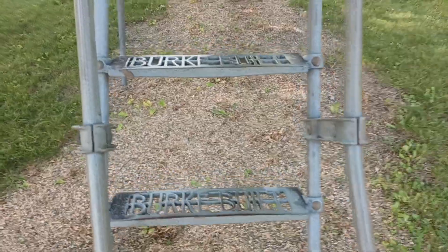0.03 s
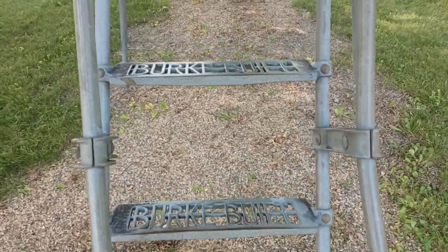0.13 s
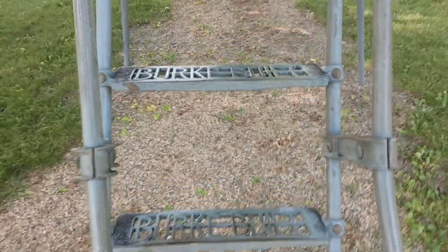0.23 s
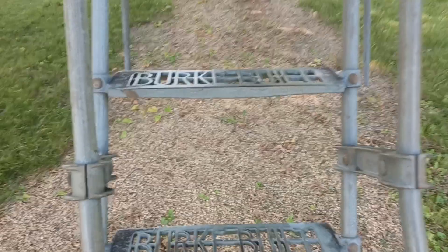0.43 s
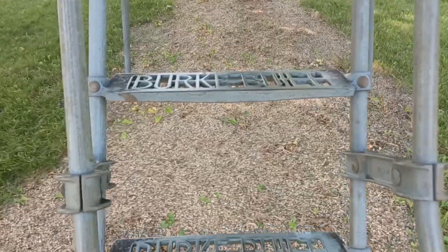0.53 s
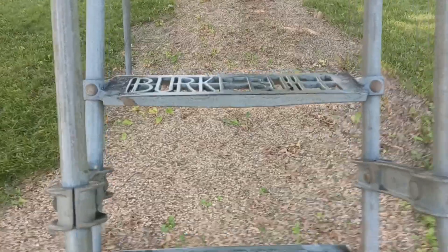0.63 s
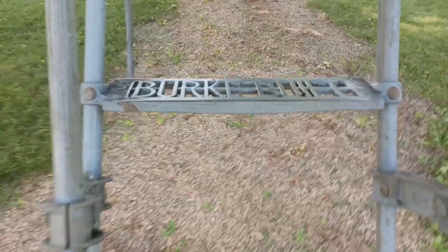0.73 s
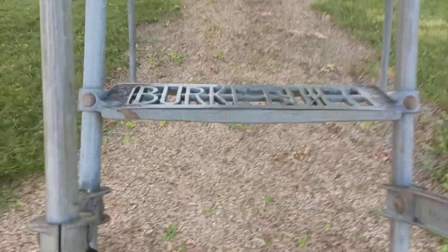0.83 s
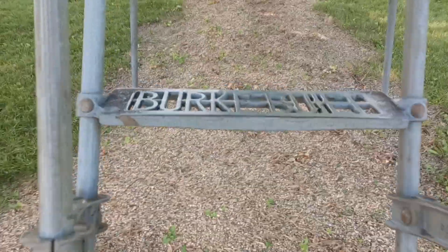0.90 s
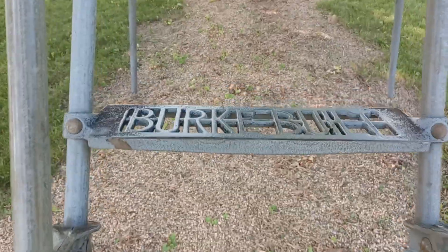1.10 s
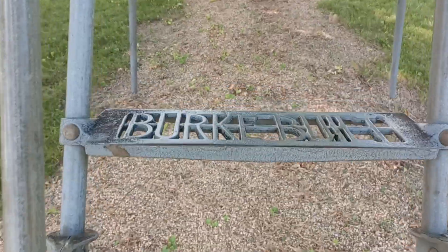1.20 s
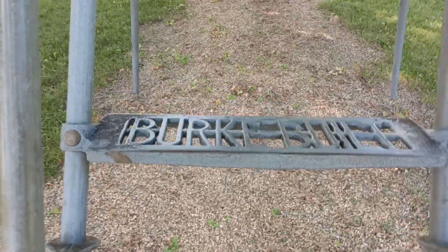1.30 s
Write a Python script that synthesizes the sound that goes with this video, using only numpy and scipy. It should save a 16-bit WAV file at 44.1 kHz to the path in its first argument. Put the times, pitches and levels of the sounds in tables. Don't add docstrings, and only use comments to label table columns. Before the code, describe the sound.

Outdoors at a playground, wood chips crunch and snap under two steps before a dull clank on a metal ladder, a short low wobbling drone and soft shuffle, with quiet distant birdsong; handheld stereo microphone.

```python
import sys
import numpy as np
from scipy import signal
from scipy.fft import rfft, irfft, next_fast_len
from scipy.io import wavfile
from scipy.ndimage import map_coordinates

SR = 44100
rng = np.random.default_rng(int(sys.argv[2]) if len(sys.argv) > 2 else 0)


def unload_audio(sound):
    columns = np.transpose(np.atleast_2d(sound))
    steps = np.round(np.clip(columns, -1, 1) * 32767)
    wavfile.write(sys.argv[1], SR, steps.astype(np.int16))


def linear_from_db(decibels):
    return 10 ** (np.asarray(decibels, float) / 20)


N = 59535

# f/Hz, density level/dB
GRIT = [(1760, -17), (3000, -5), (3350, -8), (3590, -8.5), (4860, -8.5), (8030, -18.5), (12100, -14.5),
        (15600, -16)]
# t/s, peak level/dB, f/Hz
SNAPS = [(0.117, -45.5, 1980), (0.163, -50.5, 1750), (0.247, -33.5, 585), (.255, -50, 484),
         (0.26, -32.5, 615), (0.264, -41.5, 580), (0.281, -37.5, 1240), (.281, -55, 2270),
         (.286, -38, 1650), (0.291, -34, 597), (.291, -44, 2200), (0.296, -38.5, 650), (.303, -38.5, 1480),
         (.307, -49, 594), (0.315, -33, 745), (.316, -41.5, 2530), (.322, -49, 1280), (0.326, -27, 1345),
         (.327, -32, 666), (.332, -38, 614), (0.335, -29.5, 1600), (.335, -56, 2270), (0.339, -34, 890),
         (0.345, -50, 1620), (.346, -43, 537), (0.352, -46, 1880), (.355, -43, 647), (0.363, -37.5, 1750),
         (.369, -47, 1740), (.378, -51, 1840), (0.385, -50, 1780), (0.528, -48.5, 700), (.535, -46.5, 1720),
         (.539, -53, 600), (0.548, -39, 690), (.554, -40, 1640), (0.567, -40.5, 746), (.567, -58, 1900),
         (.578, -48, 2440), (.583, -48, 1700), (0.59, -36.5, 775), (.59, -61, 2000), (0.594, -32, 1060),
         (.598, -50, 1880), (0.604, -35.5, 1250), (0.6069, -36, 1100), (0.616, -39, 630),
         (.6165, -33, 2870), (.618, -32.5, 1800), (.623, -43, 2200), (.628, -53, 1850), (0.638, -34, 2010),
         (.643, -39, 1980), (0.647, -36, 1780), (.656, -36, 2180), (0.6568, -37, 1690), (.756, -55, 1270),
         (0.919, -61, 1470), (0.931, -54, 1730), (0.948, -55, 544)]
SNAP_LATE_S = 0.000981


def unit(x):
    return x / np.sqrt(np.mean(x ** 2) + 1e-20)


def along(points, hz):
    f, v = np.transpose(points)
    return np.interp(np.log(hz + 1), np.log(f + 1), v)


def wobble(rate):
    knots = rng.standard_normal(int(N * rate / SR) + 4)
    return map_coordinates(knots, [np.arange(N) * rate / SR])


def filtered(x, response):
    m = next_fast_len(N + SR // 4)
    return irfft(rfft(x, m) * response(np.fft.rfftfreq(m, 1 / SR)), m)[..., :N]


def stereo(pair, alike):
    def turn(hz):
        return np.arccos(np.clip(along(alike, hz), -1, 1)) / 2

    mid, side = filtered(pair, lambda hz: np.array([np.cos(turn(hz)), np.sin(turn(hz))]))
    return np.array([mid + side, mid - side])


def noise(spectrum, channels):
    white = rng.standard_normal((channels, N))
    return unit(filtered(white, lambda hz: linear_from_db(along(spectrum, hz))))


def tail(x, t60):
    t = np.arange(SR // 2) / SR
    echo = rng.standard_normal((2, len(t))) * linear_from_db(-60 * t / t60)
    return signal.fftconvolve(x[None], echo / np.linalg.norm(echo[0]), axes=1)[:, :N]


def pops(s, db, hz, cycles, size):
    s, db, hz, t = s[:, None], db[:, None], hz[:, None], np.arange(size) / SR
    rise = 1 - np.exp(-6 * t * hz)
    wave = linear_from_db(db - 60 * t * hz / (3 * cycles)) * np.sin(2 * np.pi * hz * t) * rise
    at = (s * SR).astype(int) + np.arange(size)
    return np.bincount(at.ravel(), wave.ravel(), N + size)[:N]


def distance():
    # f/Hz, density level/dB
    hum_spectrum = [(15, -82), (25, -33), (134, -5.5), (204, -14.5), (441, -22.5), (505, -24.5),
                    (757, -26.5), (1110, -29.5), (2500, -33), (3250, -48.5), (5500, -120)]
    # f/Hz, density level/dB
    hiss_spectrum = [(1180, -24), (2000, -11), (2570, -8), (3460, 2), (4290, -4), (5750, -8),
                     (15600, -13.5)]
    # f/Hz, left-right likeness/1
    far_alike = [(60, 0.61), (240, 0.48), (950, -0.45), (3770, -0.089), (15000, 0.05)]
    hum = linear_from_db(-68.5 + wobble(6)) * noise(hum_spectrum, channels=2)
    hiss = linear_from_db(-80.5 + 1.6 * wobble(3.5)) * noise(hiss_spectrum, channels=2)
    side_db = 0.7
    return linear_from_db([[side_db], [-side_db]]) * stereo(hum + hiss, far_alike)


def birds():
    # start t/s, length t/s, first f/Hz, last f/Hz, level/dB
    slides = [(0.0, .05, 3400, 3600, -86), (.082, .035, 4650, 3800, -83), (.399, .012, 5300, 5100, -69),
              (.411, .011, 4750, 4550, -70), (.423, .009, 4700, 3000, -72), (.43, .025, 2850, 3900, -67),
              (.453, .006, 3800, 3400, -70), (.456, .007, 3500, 4150, -70), (.462, .007, 3500, 3100, -70),
              (.464, .011, 3800, 4000, -74), (.471, .01, 3200, 2800, -72), (.865, .04, 4100, 3400, -74),
              (.905, .03, 3500, 4200, -84), (.975, .035, 4000, 3400, -74), (1.005, .022, 4300, 3000, -75),
              (1.022, .008, 3300, 4200, -77), (1.017, .018, 4700, 4500, -74), (1.03, .033, 4600, 3150, -70),
              (1.04, .018, 4700, 4300, -74), (1.043, .01, 2900, 3300, -75), (1.052, .028, 4000, 2800, -75),
              (1.085, .035, 3000, 4600, -83), (1.12, .016, 4200, 4600, -79), (1.138, .028, 4500, 3300, -77),
              (1.159, .009, 4200, 4550, -73), (1.166, .012, 4550, 3600, -72),
              (1.176, .022, 3650, 2800, -75), (1.205, .03, 3800, 2800, -85), (1.265, .035, 4500, 3000, -82),
              (1.303, .04, 4300, 2800, -84)]
    stray_share, flutter_db, side_db, lag_samples = .012, 2.5, 1.5, 1
    trees_db, trees_t60 = 2, .2
    out, stray = np.zeros(N + SR), wobble(200)
    for s, length, from_hz, to_hz, db in slides:
        u = np.linspace(0, 1, int(length * SR))
        start = round(s * SR)
        hz = from_hz + (to_hz - from_hz) * u ** 0.9
        hz = hz + stray_share * from_hz * stray[start:][:len(u)]
        whistle = np.sin(2 * np.pi * np.cumsum(hz) / SR)
        out[start:][:len(u)] += linear_from_db(db) * np.sin(np.pi * u) ** .5 * whistle
    out = out[:N] * linear_from_db(flutter_db * wobble(180))
    pair = np.array([np.roll(out, lag_samples), out]) * linear_from_db([[side_db], [-side_db]])
    return pair + linear_from_db(trees_db) * tail(out, trees_t60)


def brush():
    # middle t/s, half length t/s, level/dB
    s, half, db = (0.933, 0.062, -75.5)
    # f/Hz, density level/dB
    cloth = [(5000, -26), (8000, -7), (12500, -3), (16000, 1)]
    swell = np.exp(-((np.arange(N) / SR - s) / half) ** 2)
    return linear_from_db(db) * swell * noise(cloth, channels=2)


def frame():
    # t/s, length t/s, level/dB, loaded tube f/Hz
    shoves = [(0.6909, 0.03, -38, 236), (.7294, 0.008, -34, 229), (0.7452, 0.021, -36.5, 206),
              (0.7735, 0.006, -42, 210), (0.8015, .008, -41, 213), (0.8224, 0.02, -40, 225),
              (.854, 0.039, -41.5, 233.2), (0.904, 0.032, -46, 237), (0.941, .012, -47, 229),
              (0.952, 0.036, -52.5, 218.5), (1.001, 0.052, -57, 231.6), (1.05, .03, -62, 213.7),
              (1.106, 0.035, -67, 221.6)]
    # pitch ratio/1, level/dB
    modes = [(0.989, 1.5), (0.595, -7.5), (1.58, -15.5), (2.3, -28.5)]
    rise_s, grip_t60, free_t60 = 0.0013, 0.03, 0.5
    out, t = np.zeros(N + SR), np.arange(SR // 4) / SR
    for s, length, db, hz in shoves:
        ring = 0
        for ratio, level in modes:
            ring = ring + linear_from_db(level + rng.normal(0, 1)) * np.sin(2 * np.pi * hz * ratio * t)
        fall = 60 * t / free_t60 + 60 * np.clip(t - length, 0, 1) / grip_t60
        out[round(s * SR):][:len(t)] += linear_from_db(db - fall) * (1 - np.exp(-t / rise_s)) * ring
    return out[:N]


def ladder():
    # t/s, level/dB, time until damped t/s, scuff level/dB
    knocks = [
        (.6788, -36, .014, -8),
        (.7447, -49, .004, 11),
    ]
    # f/Hz, level/dB, t60/s
    rung = [(200, -8, .06), (305, 3, .07), (450, -6, .04), (850, -1, .035), (1250, -8, .025),
            (1700, -12, .025), (2600, -9, .1), (4064, -24, .05), (5100, -21, .06), (6298, -21, .08),
            (7400, -26, .06), (10900, -34, .03)]
    scuff_s, damp_t60, rise_s = .013, .03, 0.0002
    settle_db, settle_t60 = -17, .22
    out, t = np.zeros(N + SR), np.arange(SR // 2) / SR
    for s, db, free, scuff_db in knocks:
        ring = 0
        for hz, level, t60 in rung:
            ring = ring - linear_from_db(level + rng.normal(0, 1) - 60 * t / t60) * np.sin(2 * np.pi * hz * t)
        ring = ring * linear_from_db(-60 * np.clip(t - free, 0, 1) / damp_t60) * (1 - np.exp(-t / rise_s))
        rub = np.convolve(rng.standard_normal(len(t)), np.hanning(9) / 4, "same")
        scrape = linear_from_db(scuff_db - 60 * t / scuff_s)
        settle = linear_from_db(scuff_db / 2 + settle_db - 60 * t / settle_t60)
        out[round(s * SR):][:len(t)] += linear_from_db(db) * (ring + (scrape + settle) * rub)
    return out[:N]


def chip_bed(s, grain_hz):
    # f/Hz, level/dB
    chip_colour = [(150, -17.5), (350, 0.5), (700, -6.5), (1500, -4.5), (2600, 0.5), (3600, -31),
                   (6000, 1.5), (16000, -20)]
    # f/Hz, level/dB
    soil = [(60, -5), (130, -5), (260, 7.5), (500, -26.5)]
    grains_per_s, spread, cycles = 2200, .45, 2.2
    size_db, tilt_db, clump_db = 1.8, 2, 2
    draw = rng.random((int(grains_per_s * N / SR), 2))
    when = np.abs(np.arange(len(draw)) - 3 * draw[:, 0]) / grains_per_s
    scatter = np.exp(spread * rng.standard_normal(len(draw)))
    pitch = np.clip(np.interp(when, s, grain_hz) * scatter, 430, 5000)
    level = tilt_db * np.log2(pitch / 1000) - size_db * np.log(draw[:, 1])
    grains = pops(when, level, pitch, cycles, size=700)
    grains = filtered(grains, lambda hz: linear_from_db(along(chip_colour, hz)))
    grains = unit(linear_from_db(clump_db * wobble(120.33)) * grains)
    return linear_from_db(-1.5) * grains + linear_from_db(-12.5) * noise(soil, channels=1)[0]


def sliding_grit():
    lumps = linear_from_db(2 * wobble(250) + 0.32 * wobble(36.7))
    return unit(lumps * noise(GRIT, channels=2))


def snaps():
    s, db, pitch = np.transpose(SNAPS)
    s = s + SNAP_LATE_S
    cycles, top_hz = 3, 3300
    out = pops(s, db - 15.5, 1100 - pitch / 5, cycles, size=900)
    out = out - pops(s, db + 1.5, pitch, cycles, size=900)
    return filtered(out, lambda hz: 1 / (1 - (hz / top_hz) ** 2 + 1j * hz / top_hz))


def cracks():
    # t/s, peak level/dB, f/Hz
    ticks = [(0.1172, -45, 9300), (0.161, -59, 5600), (0.2489, -36, 5850), (.2478, -44, 14000),
             (.316, -37, 4730), (.3195, -45, 12000), (.3565, -27.5, 12000), (.5525, -52, 6230),
             (0.5781, -42, 6060), (0.617, -59, 5080), (.6545, -45, 5450), (0.745, -57, 8000),
             (.807, -69, 5500)]
    s, db, _ = np.transpose(SNAPS)
    bursts = np.bincount(((s + SNAP_LATE_S) * SR).astype(int), linear_from_db(db - 26), N)
    fade = linear_from_db(-60 * np.arange(400) / SR / .004)
    hiss = np.convolve(bursts, fade)[:N] * noise(GRIT, channels=2)
    side_share = .1
    return hiss + pops(*np.transpose(ticks), 3.5, size=200) * [[1], [side_share]]


def chips():
    # t/s, load level/dB, sliding level/dB, grain f/Hz
    steps = [(0, -59.5, -69.5, 536), (0.05, -85.5, -100, 700), (0.111, -77, -76.5, 1580),
             (.2, -71, -81.5, 2080), (0.24, -65, -83, 2010), (0.249, -55, -68, 1090),
             (0.301, -51, -58, 1000), (.35, -49.5, -58, 1430), (0.377, -57.5, -63.5, 1340),
             (0.411, -70.5, -75.5, 1200), (0.508, -76.5, -79.5, 1020), (0.548, -55.5, -72.5, 1210),
             (.59, -49, -64.5, 1054), (0.66, -43, -59, 1460), (0.668, -60, -62.5, 1320),
             (0.693, -54.5, -65, 720), (0.764, -55.5, -68.5, 820), (0.821, -63.5, -81, 550)]
    # t/s, load level/dB, sliding level/dB, grain f/Hz
    shuffle = [
        (.86, -79.5, -83, 700),
        (.915, -77, -81, 800),
        (0.945, -68, -84, 790),
        (.975, -74.5, -80, 704),
        (1.08, -100, -83, 900),
    ]
    s, load_db, slide_db, grain_hz = np.transpose(np.vstack([steps, shuffle]))
    t = np.arange(N) / SR
    load = linear_from_db(np.interp(t, s, load_db, right=-120))
    slide = linear_from_db(np.interp(t, s, slide_db, right=-120))
    crunch = load * chip_bed(s, grain_hz) + snaps()
    return crunch, slide * sliding_grit() + cracks()


def scene():
    # f/Hz, level/dB
    ports = [(60, 0), (200, .5), (380, -.5), (700, -1.5), (1300, -3.5), (2400, -6.5), (4400, 0),
             (8100, 2.5)]
    # f/Hz, left-right likeness/1
    near_alike = [(300, .97), (2000, .7), (4000, .2), (9000, .05)]
    ground_db, ground_t60 = -9, .06
    lag_s, low_cut_hz = .00005, 110
    crunch, grit = chips()
    near = crunch + ladder()
    near = near + frame() + linear_from_db(ground_db) * tail(near, ground_t60) + stereo(grit, near_alike)
    side = np.array([[.5], [-.5]])

    def arrival(hz):
        cut = (1j * hz / (low_cut_hz + 1j * hz)) ** 2 * 1j * hz / (low_cut_hz / 2 + 1j * hz)
        return cut * linear_from_db(side * along(ports, hz)) * np.exp(-2j * np.pi * hz * lag_s * side)

    return filtered(near, arrival) + brush() + birds() + distance()


def low_pass(x):
    return signal.sosfilt(signal.butter(12, 15710, fs=SR, output="sos"), x)


def record(dry):
    mix = filtered(dry, lambda hz: hz < 15750)
    return low_pass(mix)


dry = scene()
out = record(dry)
unload_audio(out)
```